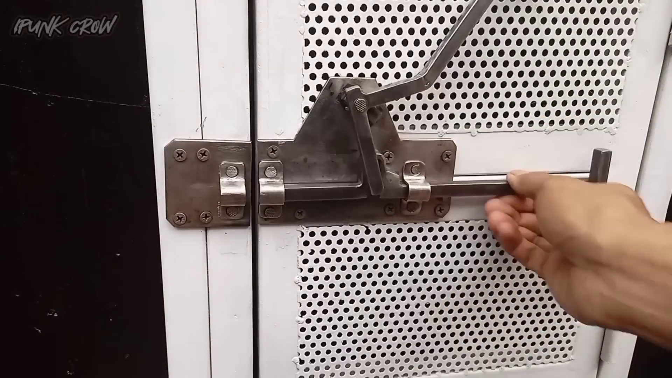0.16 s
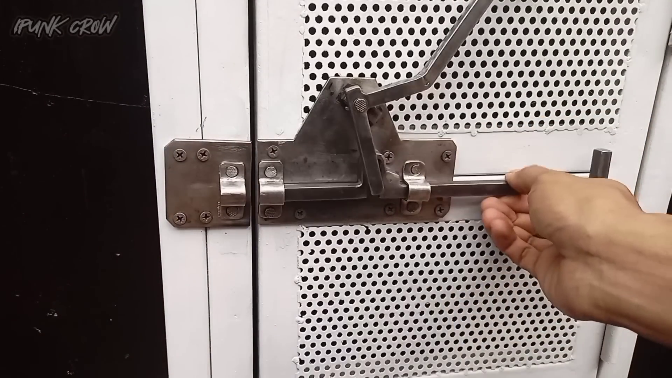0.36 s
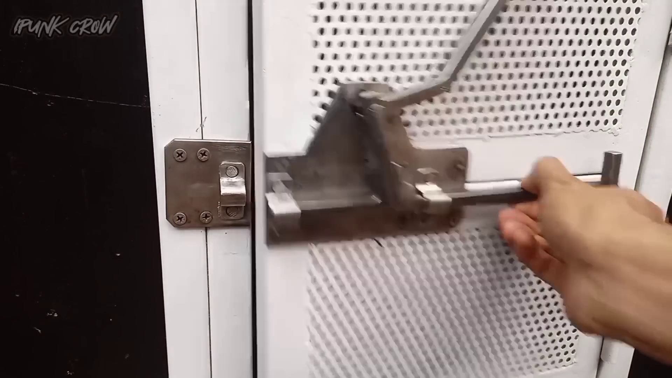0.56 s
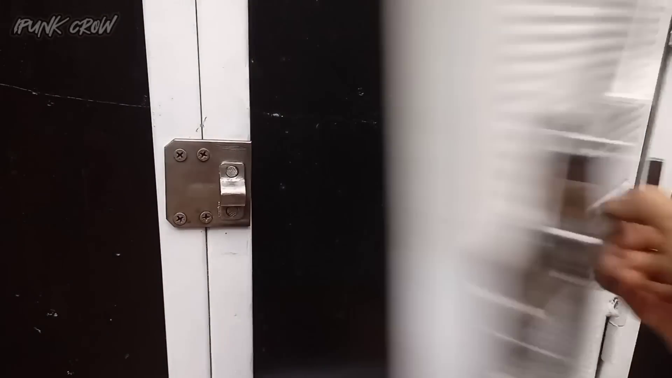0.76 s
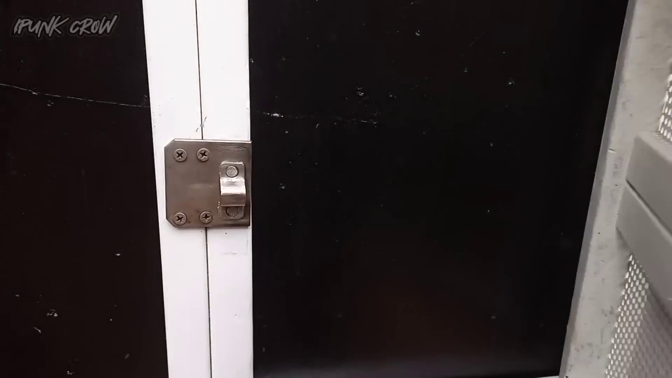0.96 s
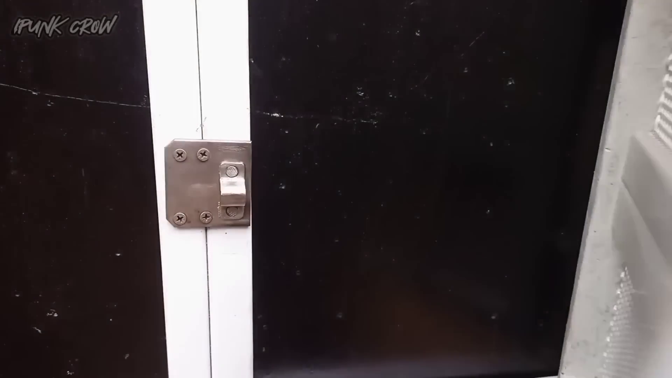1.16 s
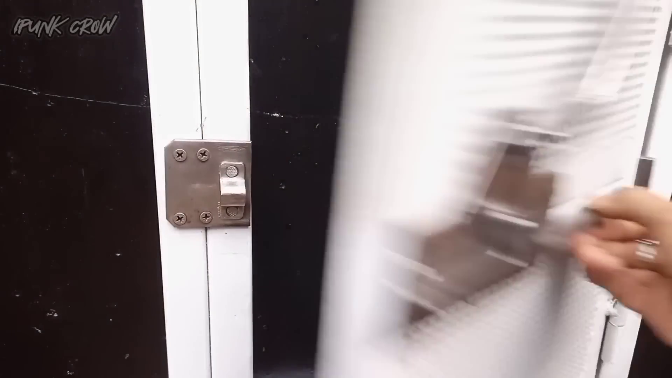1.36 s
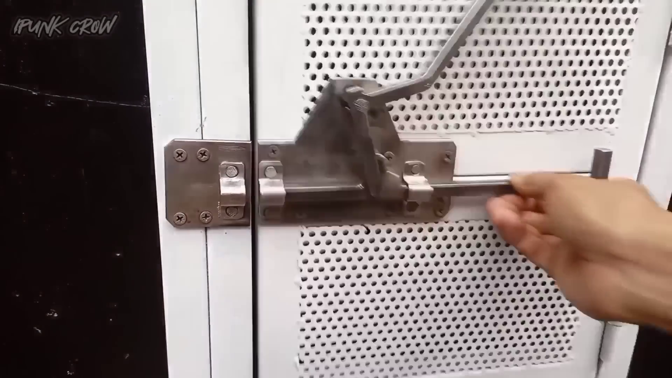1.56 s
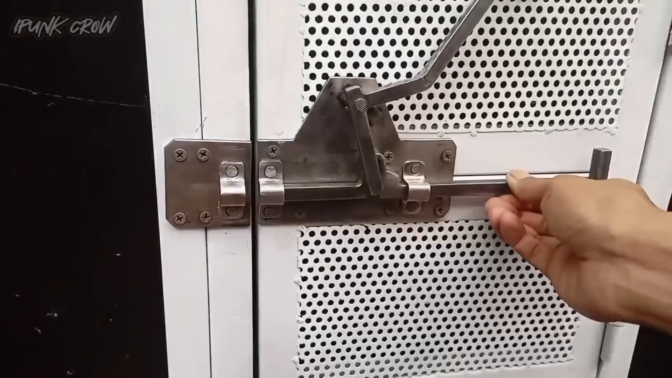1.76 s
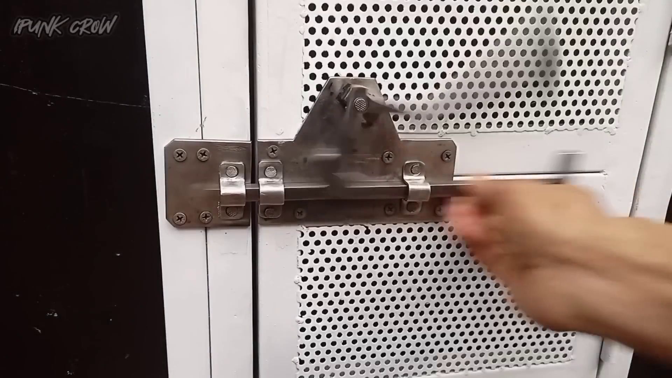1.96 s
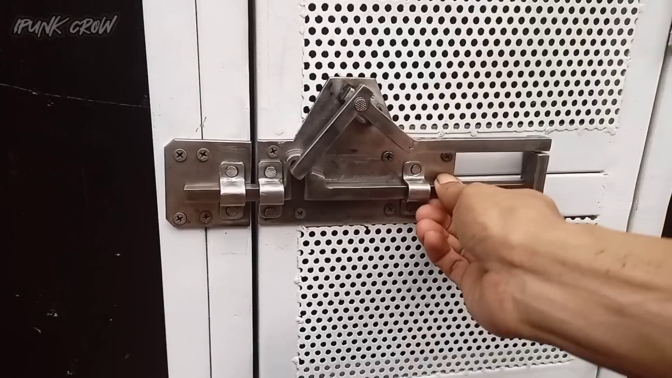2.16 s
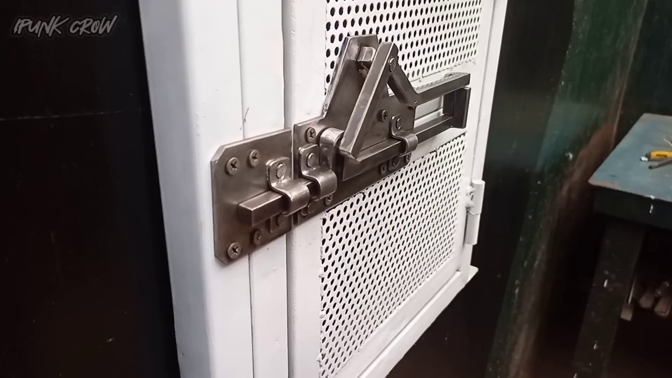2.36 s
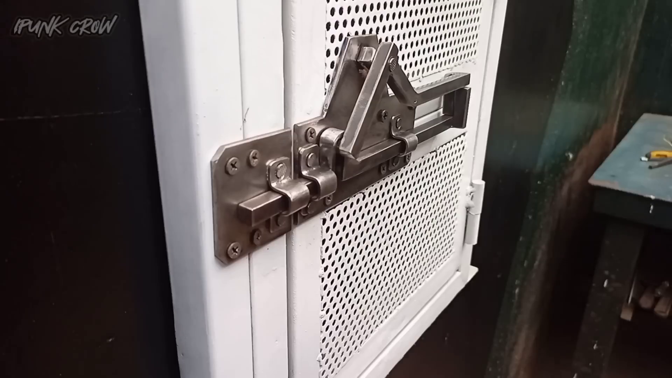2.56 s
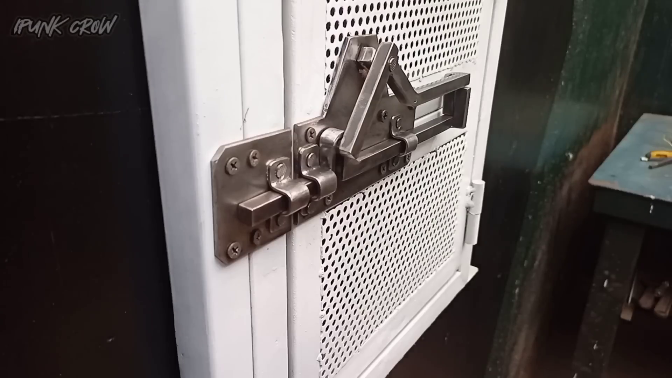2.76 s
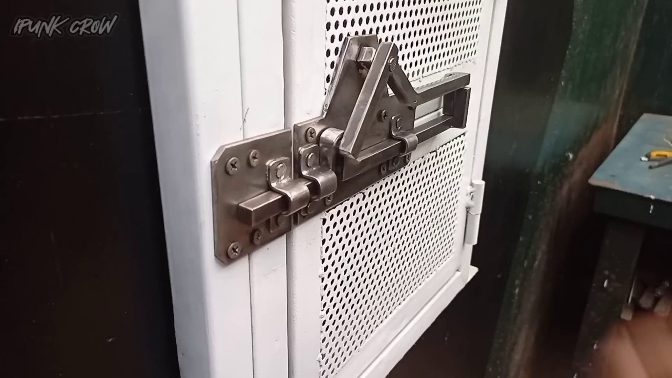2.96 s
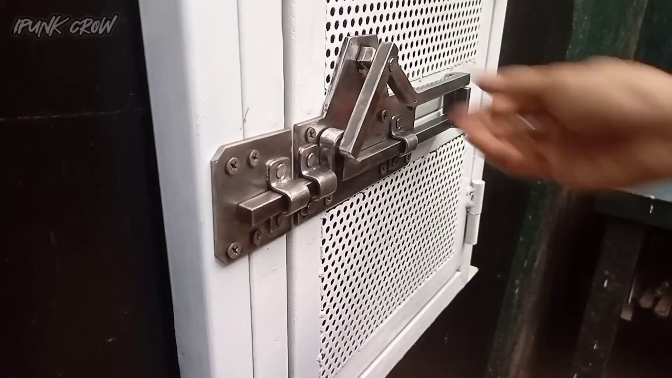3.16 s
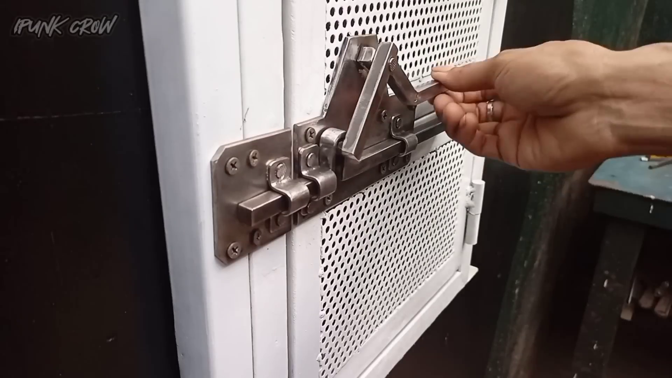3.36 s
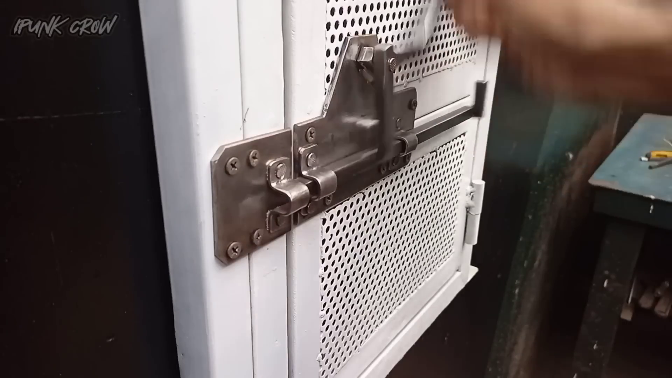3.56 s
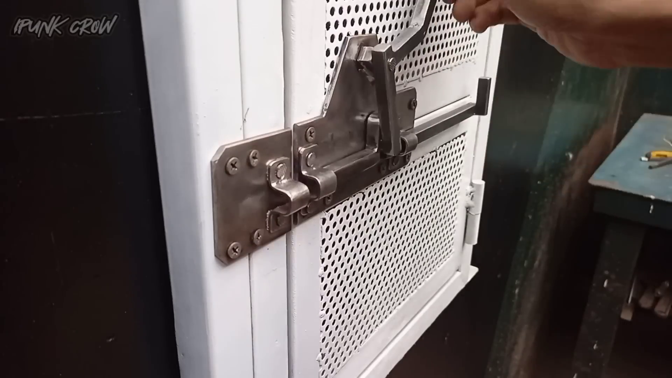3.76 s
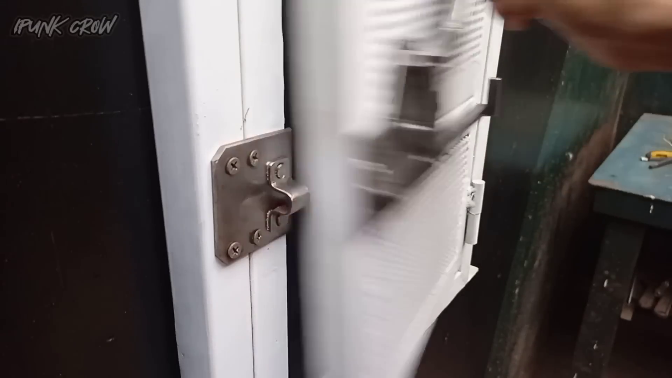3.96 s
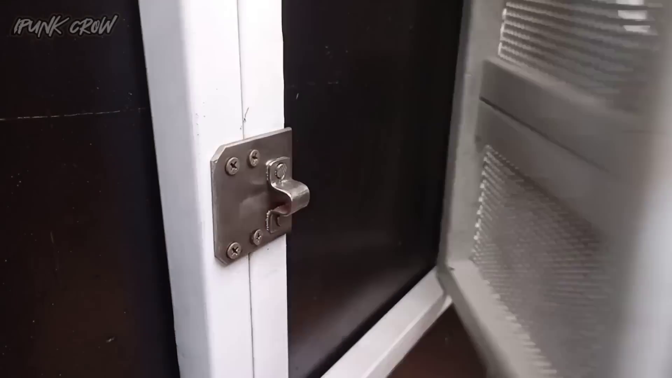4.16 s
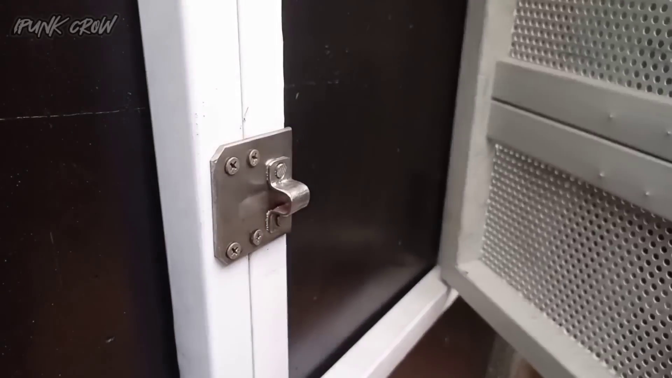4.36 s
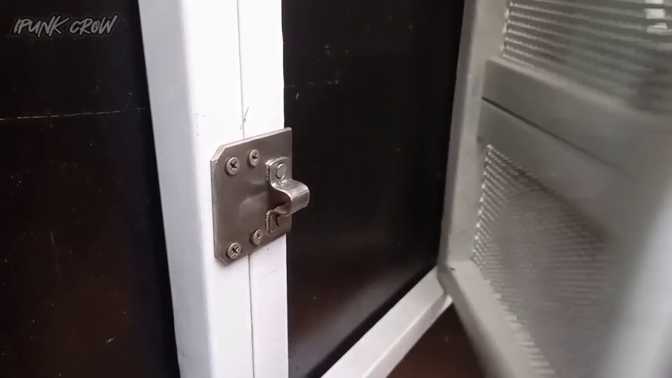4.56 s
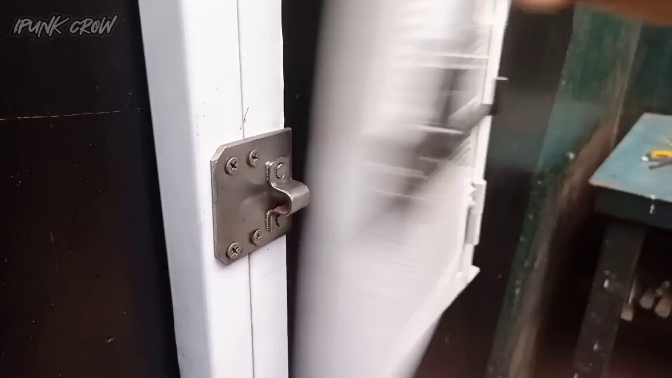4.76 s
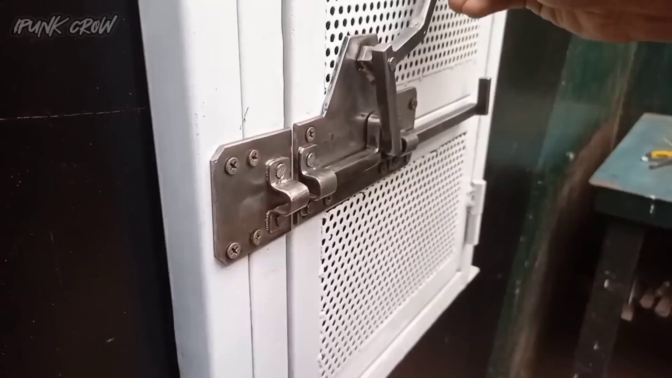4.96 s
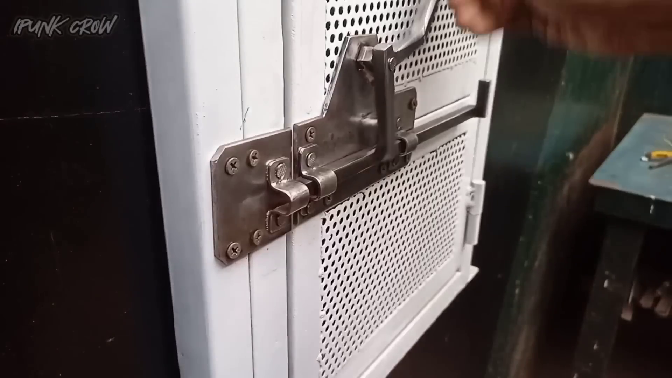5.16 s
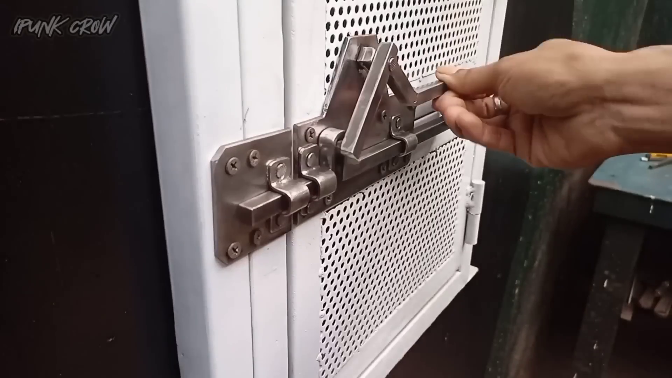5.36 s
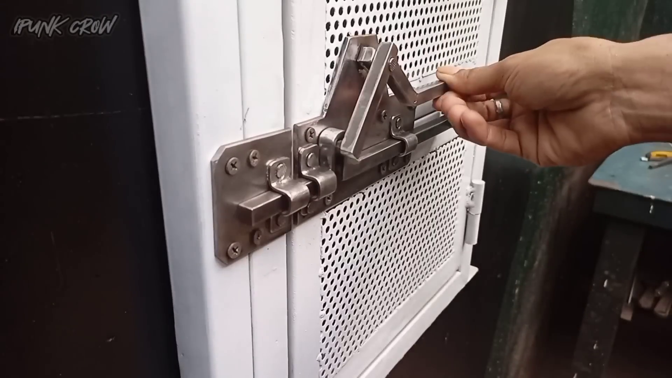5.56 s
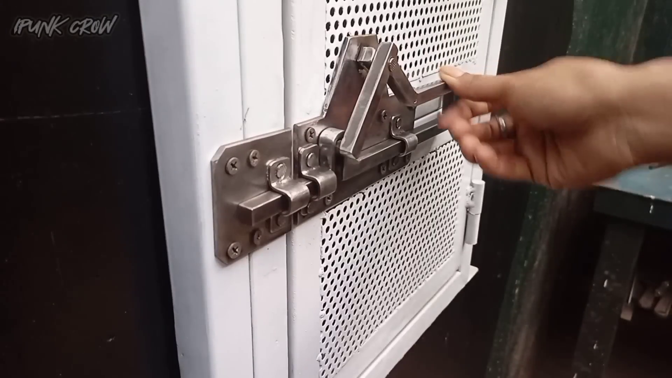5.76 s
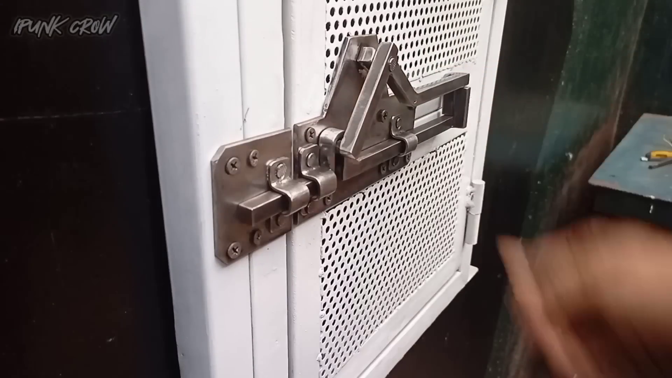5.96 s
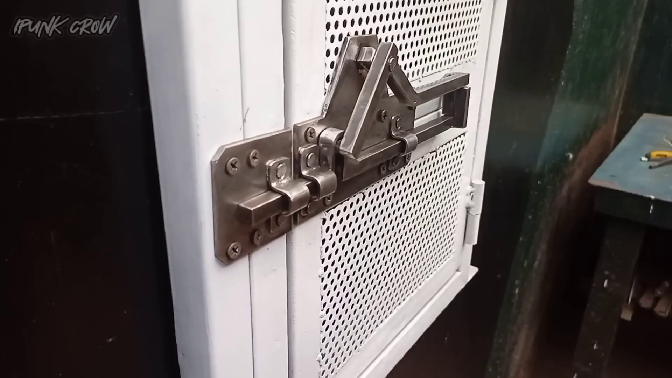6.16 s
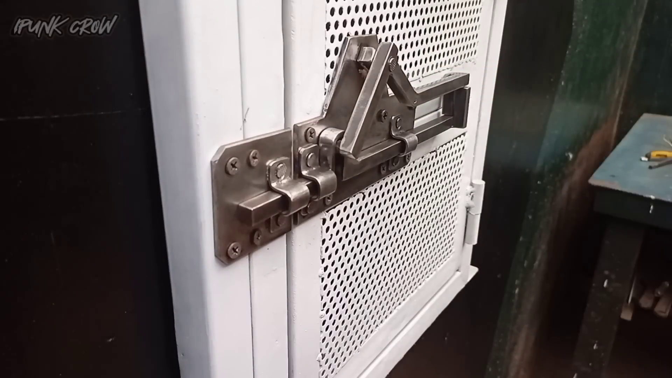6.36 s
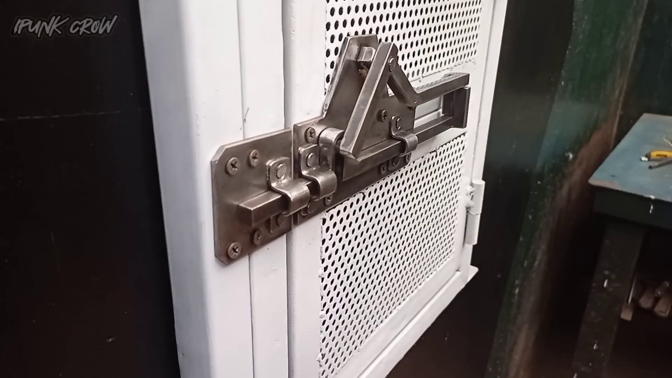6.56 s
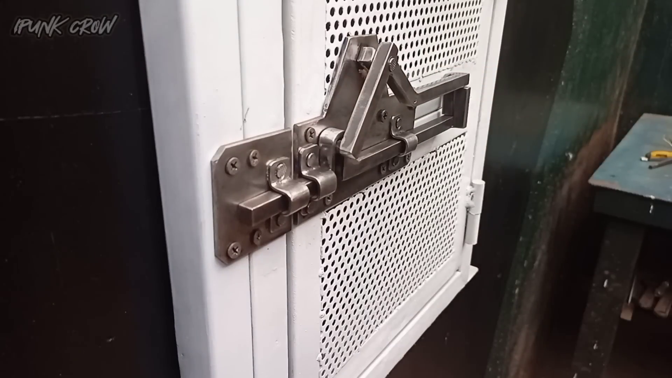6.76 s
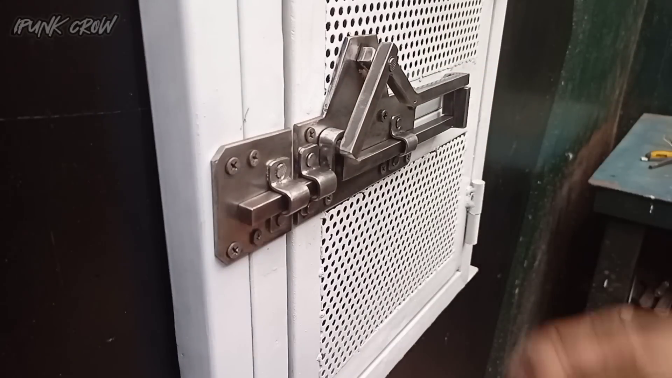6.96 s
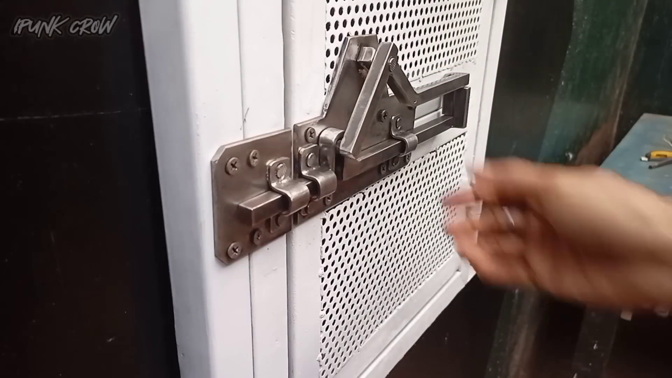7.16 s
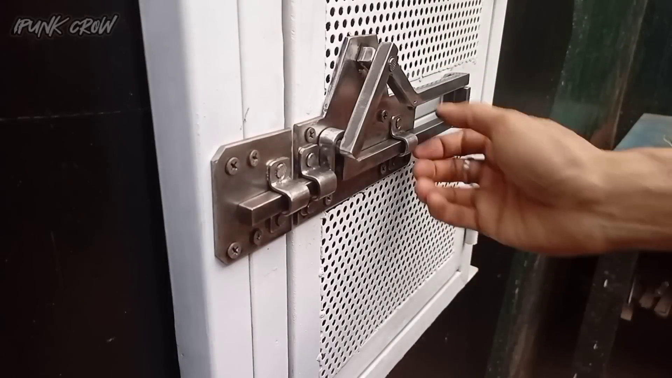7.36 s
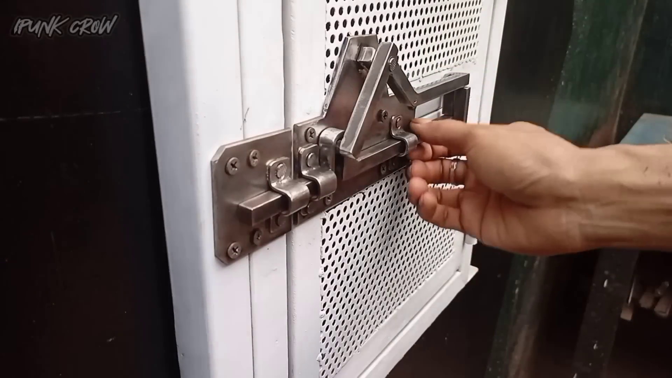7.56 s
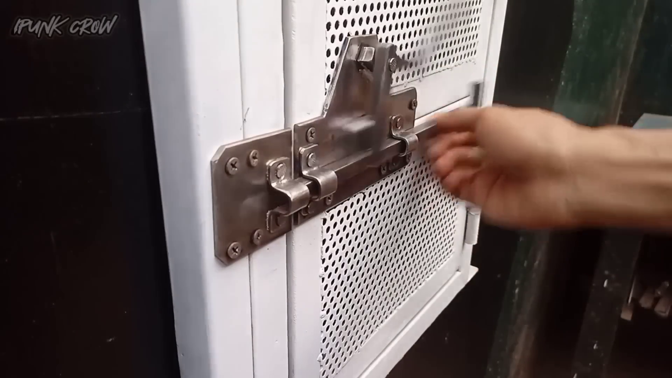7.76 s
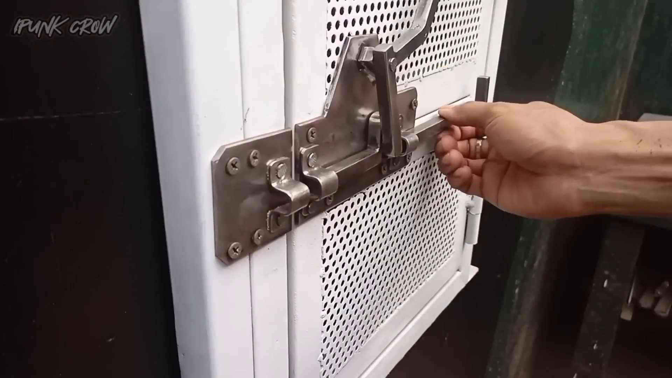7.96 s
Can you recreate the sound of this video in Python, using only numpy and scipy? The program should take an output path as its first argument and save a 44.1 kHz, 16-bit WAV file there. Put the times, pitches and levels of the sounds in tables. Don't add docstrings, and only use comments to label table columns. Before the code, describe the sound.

Close metallic clacks and short bolt scrapes, a sheet door banging shut twice, ringing echoes and a faint distant motor hum.

```python
import sys
import numpy as np
from scipy import signal
from scipy.fft import rfft, irfft
from scipy.io import wavfile
from scipy.ndimage import uniform_filter1d

SR = 44100
rng = np.random.default_rng(int(sys.argv[2]) if len(sys.argv) > 2 else 0)


def output_pcm(signal):
    pcm = np.clip(np.atleast_2d(signal).T, -1, 1) * 32767
    wavfile.write(sys.argv[1], SR, np.round(pcm).astype(np.int16))


def makeup_ratio(level_db):
    decades = np.asarray(level_db, float) / 20
    return 10 ** decades


N = 357210

# (frequency [Hz], level [dB])
MOTOR_PARTIALS = [(339.1, -83.5), (393.0, -68.5), (452.2, -73.5), (780.6, -82), (877.5, -78.5),
                  (952.8, -76), (1017, -77.5), (1513, -70), (1637, -87), (1690, -85.5), (1733, -87.5),
                  (1793, -84)]
# (time [s], motor gain [dB], air level [dB])
BACKGROUND_COURSE = [(0, -3.5, -61), (2.5, -5.5, -68), (2.6, -2.5, -68), (4, -1, -65.5), (6, -2.4, -65.5),
                     (8.1, -3, -67)]
# (frequency [Hz], density [dB per Hz])
AIR_SPECTRUM = [(76, -44), (130, -18.5), (240, -24.5), (350, -7.5), (450, -22), (560, -18), (950, -11),
                (1150, -16.5), (1370, -28.5), (1520, -7), (1800, -14), (2100, -28.5), (2700, -31),
                (3500, -23), (4500, -22), (5100, -30.5), (6300, -27.5), (7500, -40.5), (8400, -60)]
# (centre time [s], half length [s], level [dB])
RUMBLE_SWELLS = [(.55, .2, -61), (1.4, .25, -64), (1.95, .15, -58.5), (2.45, .25, -71.5), (3.9, .12, -69.5),
                 (4.5, .1, -74.5), (5.2, .3, -71), (5.55, .15, -60), (6.4, .2, -69), (7.1, .2, -74),
                 (7.65, .3, -72.5)]
# (frequency [Hz], level [dB], t60 [s])
ROOM_BANDS = [(246.5, -3, 0.54), (616, -4.5, 0.59), (1100, -1.5, 0.23), (1800, -2.5, 0.4), (3174, -4, 0.52),
              (4500, -1.5, 0.35), (6500, 0.5, 0.2), (7400, -6.5, 0.56)]
# (time [s], level [dB])
SLAMS = [
    (1.773, -30.5),
    (5.05, -27.5),
]
# (frequency [Hz], level [dB], t60 [s])
LEAF_BANDS = [(116.25, -5, .4), (176, -5.5, 0.59), (243, -2, 1), (285, 4.5, 0.41), (395, -9.5, 0.48),
              (537.6, 4, 0.46), (750, -3.5, 0.61)]
# (frequency [Hz], level [dB], t60 [s])
LEAF_MODES = [(76.5, -15, 0.68), (162.6, -3, .4), (227, -3.5, .55), (322, -2, .35), (409, -2, .4),
              (515, -12.5, 0.34), (532, -14.5, 0.34)]
# (time [s], peak [dB], frequency [Hz], t60 [s])
PINGS = [(.176, -22.5, 1640, 0.18), (.195, -26.5, 6560, .044), (.2655, -16.5, 2230, .057),
         (.265, -16.5, 6500, .03), (.77, -60, 2150, 0.085), (3.75, -28.5, 2735, 0.094),
         (3.788, -19.5, 2100, 0.061), (3.788, -20.5, 3420, .07), (4.046, -32, 2250, 0.06),
         (4.062, -35, 2370, 0.028), (4.112, -36.5, 2150, 0.05), (4.288, -54.5, 5500, .036),
         (5.392, -22, 3380, 0.053), (5.427, -13.5, 3323, .09), (5.428, -13.5, 2133, .09),
         (5.452, -18, 3574, 0.0699), (5.452, -23, 2166, 0.13), (5.472, -17.5, 2870, 0.049),
         (7.931, -16.5, 3640, 0.081), (7.933, -19.5, 2740, 0.065), (7.933, -26, 4240, .07)]
# (time [s], peak [dB], frequency [Hz])
PLATE_NOTES = [(.17, -37.5, 860), (.997, -39, 750), (1.776, -28, 749), (5.054, -33, 775), (2.098, -41, 764),
               (2.118, -41, 724), (2.136, -35.5, 730), (3.684, -50, 895), (4.13, -58, 930),
               (4.412, -46.5, 940), (7.629, -49.5, 948), (7.931, -56, 890)]
# (frequency [Hz], density [dB per Hz])
STEEL_SPECTRUM = [(290, -45.5), (500, -21), (1210, -11.5), (1610, -10.5), (2110, -7.5), (2430, -10),
                  (3450, -11), (4530, -12.5), (6530, -11.5), (7520, -10), (8360, -6.5), (10900, -68),
                  (18400, -120)]
# (frequency [Hz], level [dB], t60 [s])
LATCH_MODES = [(1284, -14.5, 0.17), (1750, -24, 5.0), (1863, 3.5, 0.11), (2014, -2, 0.26),
               (2380, -27, 0.26), (3520, -7, 0.062), (3630, 0.5, 0.099), (3750, -11, 0.51),
               (3700, -25, 5.0), (4420, -4, 0.055), (4420, -33, 1.4), (4944, -20, 0.36), (5500, -33, 5.0),
               (6310, -6.5, 0.31), (6500, -30, 0.49), (6960, -55, 0.29)]
# (start time [s], end time [s], start level [dB], end level [dB], centre frequency [Hz])
SLIDES = [
    (0.175, 0.265, -17, -22.5, 2240),
    (2.1, 2.145, -27, -36, 2340),
    (2.158, 2.214, -24.5, -10, 2690),
    (3.7, 3.784, -25.5, -20, 2750),
    (3.79, 3.81, -18, -21, 2760),
    (5.432, 5.482, -13, -27, 2523),
    (7.94, 8.019, -14, -14.5, 2870),
]
# (time [s], peak [dB], strongest ring [Hz], treble re peak [dB])
GRAZES = [
    (1.741, -53, 2912, -15),
    (3.47, -59, 2284, -18),
    (5.025, -52, 3400, -12),
    (6.83, -66, 1800, -5),
    (6.89, -62, 2004, -13),
    (7.618, -46, 2585, -24),
    (7.916, -47.5, 3450, -17),
]
# (time [s], peak [dB], strongest ring [Hz], treble re peak [dB], rattle t60 [s])
TAPS = [(0.6227, -39, 2990, -6.5, 0.048), (0.9956, -20.5, 1830, -7.5, 0.038),
        (1.4636, -47.5, 1877, -12.5, 0.064), (3.4602, -50.5, 2310, -21.5, .06),
        (4.1297, -16, 3760, -9, .03), (4.4139, -35.5, 2710, -14, 0.12), (7.629, -29.5, 2860, -23, .045),
        (7.7254, -39, 2250, -21, 0.11)]
EARLIER_BLOW = (-.06, -31, 3600, -8, -6)
# (time [s], peak [dB], strongest ring [Hz], treble re peak [dB], echo share [dB])
THROWS = [(0.17, -11.5, 3634, -13.5, -6.5), (0.1959, -23.5, 1635, -2.5, -4),
          (0.2085, -20.5, 1630, -14, -8.5), (2.0912, -28.5, 2380, -6, 2), (2.0965, -19, 2250, -9.5, -8),
          (2.1156, -26.5, 2920, -29.5, -11), (2.1499, -17, 3630, -17.5, -15), (2.1537, -11.5, 1857, -5, 1),
          (3.6832, -17.5, 3043, -20, -13.5), (3.7389, -27, 2570, -28.5, -6), (3.7702, -15, 2633, -10, -3),
          (3.7883, -20.5, 3400, -16.5, -9), (3.8127, -16.5, 3590, -11, -7.5),
          (5.3473, -28.5, 3240, -8.5, -3.5), (5.3749, -26.5, 3857, -13, -1),
          (5.391, -17, 6700, -8.5, -12.5), (5.4291, -19.5, 2170, -6, -14.5), (5.452, -18, 2106, -19.5, 5),
          (7.9324, -14.5, 3590, -12, -4)]
# (time [s], peak [dB], strongest ring [Hz], treble re peak [dB])
BOUNCES = [
    (1.7753, -11, 6380, -9.5),
    (1.7874, -13.5, 1800, -17.5),
    (1.8114, -20.5, 4250, -9.5),
    (5.0539, -5, 2380, -7),
    (5.0614, -9.5, 2370, -17),
    (5.0795, -10, 2247, -12.5),
]
# (frequency [Hz], level [dB], swell [s])
THUD_MODES = [(115, -7.5, 0.0025), (316, -6, 0.00079), (609, -2.5, 0.0011)]
# (time [s], peak [dB], strongest ring [Hz], thump [dB], excess [dB])
STOPS = [
    (0.275, -9, 1735, -26, 7.5),
    (2.2111, -7, 6100, -25.5, 9),
    (3.8288, -8, 3560, -25, 6.5),
    (5.4879, -6.5, 3170, -22.5, 6),
    (8.0254, -6, 3540, -22.5, 10),
]


def level(x, db):
    return x * makeup_ratio(db) / np.sqrt(np.mean(x ** 2))


def peak(x, db):
    return x * makeup_ratio(db) / np.abs(x).max()


def decay(t, t60):
    return np.exp(-np.log(1000) * t / t60)


def colour(x, table):
    hz, db = np.transpose(table)
    f = np.arange(len(x) // 2 + 1) * SR / len(x) + 1
    return irfft(rfft(x) * makeup_ratio(np.interp(np.log(f), np.log(hz), db)), len(x))


def band(x, hz, width):
    return signal.lfilter(*signal.iirpeak(hz, hz / width, fs=SR), x)


def double_band(x, hz, width):
    return band(band(x, hz, width), hz, width)


def walk(rate):
    k = int(SR / rate)
    held = np.repeat(rng.standard_normal(N // k + 1), k)
    return 1.3 * uniform_filter1d(uniform_filter1d(held, k), k)[:N]


def add(out, x, s):
    i = int(s * SR)
    a, b = max(i, 0), min(i + len(x), len(out))
    out[a:b] += x[a - i:b - i]


def motor():
    t = np.cumsum(1 + 0.001 * walk(1.2)) / SR
    out = np.zeros(N)
    for hz, db in MOTOR_PARTIALS:
        flicker = np.sqrt(2) * makeup_ratio(db + 2.5 * walk(18))
        out += flicker * np.sin(2 * np.pi * hz * t + 1.5 * walk(13))
    return out


def moving_air():
    patches = np.zeros(N)
    for hz in 130 * 2 ** np.arange(0, 6.1, .1):
        noise = double_band(rng.standard_normal(N), hz, hz / 22) / np.sqrt(hz)
        gust_db = 3 * walk(7) + 3.5 * walk(22)
        patches += noise * makeup_ratio(min(hz / 2500, 1) * gust_db)
    return colour(patches, AIR_SPECTRUM)


def rumble():
    noise = double_band(rng.standard_normal(N), 78, 62) * makeup_ratio(2.0 * walk(21))
    s, half, db = np.transpose(RUMBLE_SWELLS)[:, :, None]
    bells = makeup_ratio(db) * np.exp(-((np.arange(N) / SR - s) / half) ** 2)
    return level(noise, 0) * (makeup_ratio(-80.5) + np.sum(bells, axis=0))


def background():
    s, *columns = np.transpose(BACKGROUND_COURSE)
    motor_db, air_db = [np.interp(np.arange(N) / SR, s, column) for column in columns]
    return motor() * makeup_ratio(motor_db) + level(moving_air(), air_db) + rumble()


def echo(size=32768):
    t, out = np.arange(size) / SR, np.zeros(size)
    for hz, db, t60 in ROOM_BANDS:
        noise = double_band(rng.standard_normal(size), hz, 0.85 * hz)
        out += level(noise, db) * np.sqrt(hz) * decay(t, t60)
    gate = np.exp(-(t / 0.41) ** 4)
    out *= (1 - np.exp(-t / 0.0069)) * gate
    return out / np.sqrt(np.sum(out ** 2))


def room(sent, count=8):
    spot_s = .003
    turn = np.arange(len(sent)) / SR / spot_s
    wet = np.zeros(len(sent))
    for k in range(count):
        distance = np.abs((turn - k) % count - count / 2)
        share = np.cos(np.pi / 2 * np.minimum(distance, 1))
        wet += signal.fftconvolve(sent * share, echo())[:len(sent)]
    return wet


def slams(size=30000):
    out, t = np.zeros(N), np.arange(size) / SR
    for s, db in SLAMS:
        crowd, clear = np.zeros((2, size))
        for hz, mode_db, t60 in LEAF_BANDS:
            noise = double_band(rng.standard_normal(size), hz, 1.1 * hz)
            crowd += level(noise, mode_db) * decay(t, t60)
        for hz, mode_db, t60 in LEAF_MODES:
            clear += makeup_ratio(mode_db) * np.sin(2 * np.pi * (hz * t + rng.random())) * decay(t, t60)
        boom = (peak(crowd, -4.5) + peak(clear, -2)) * (1 - np.exp(-t / 0.012))
        add(out, boom * makeup_ratio(db + 5.0), s)
    return out


def ping(hz, t60, size=8192):
    t = np.arange(size) / SR
    noise = double_band(rng.standard_normal(size), hz, .14 * hz)
    return peak(noise * (1 - np.exp(-t / .0008)) * decay(t, np.clip(t60, .01, .4)), 0)


def steel(noise, hz, bright_db, ring_db):
    contact = [(800, -8.5), (1400, -5), (4200, -2.0), (5200, bright_db + 6.5)]
    x = colour(colour(noise, STEEL_SPECTRUM), contact)
    return level(x, 0) + level(band(x, hz, 0.41 * hz), ring_db)


def slides():
    out = np.zeros(N)
    for start, end, start_db, end_db, hz in SLIDES:
        t = np.arange(0, end - start, 1 / SR)
        noise = rng.standard_normal(8192)
        slip_sizes = makeup_ratio(3 * np.minimum(rng.exponential(size=64), 2.5))
        slips = uniform_filter1d(slip_sizes.repeat(128), 64)
        grit = level(steel(noise * slips, hz, -17.5, -11), 0)[:len(t)]
        edges = np.minimum(np.minimum(t, t[-1] - t) / 0.0033, 1)
        jerk = makeup_ratio(start_db - 1000.5 * t)
        press = makeup_ratio(end_db - 300.5 * (t[-1] - t))
        add(out, grit * edges * (jerk + press) * makeup_ratio(-10.0), start)
    return out


def ring(gains, size):
    hz, db, t60 = np.transpose(LATCH_MODES)[:, :, None]
    t = np.arange(size) / SR
    modes = decay(t, np.clip(t60, .02, .11)) * np.sin(2 * np.pi * hz * t)
    return np.sum(gains[:, None] * makeup_ratio(db) * modes, axis=0)


def blow(hz, bright_db, t60, ring_db=-7, size=8192):
    t = np.arange(size) / SR
    chatter, push = rng.standard_normal((2, size))
    gains = rng.standard_normal(len(LATCH_MODES))
    fade = (1 - np.exp(-t / .002)) * decay(t, np.clip(t60, .01, .4))
    excitation = (push * np.exp(-t / 0.0032))[:1024]
    modes = signal.fftconvolve(ring(gains, size), excitation)[:size]
    return peak(steel(chatter, hz, bright_db, ring_db) * fade, 0) + peak(modes, -19.5)


def thump(size=4096):
    t = np.arange(size) / SR
    body = np.zeros(size)
    for hz, db, swell in THUD_MODES:
        pulse = t / swell * np.exp(-t / swell)
        body += makeup_ratio(db) * pulse * np.sin(2 * np.pi * (hz * t + rng.random()))
    push = rng.standard_normal(size) * t * np.exp(-t / 0.0035)
    shudder = band(band(push, 190, 1100), 150, 1200)
    return peak(peak(body, 0) + peak(shudder, -4), 0)


def latch():
    blows = [(*row, .055) for row in [EARLIER_BLOW, *THROWS]]
    blows += [(*row, -8, .055) for row in BOUNCES]
    blows += [(*row, -12, t60) for *row, t60 in TAPS]
    blows += [(*row, -6.5, 0.18) for row in GRAZES]
    sounds = []
    for s, db, hz, bright_db, echo_db, t60 in blows:
        sounds.append((s, makeup_ratio(db) * blow(hz, bright_db, t60), echo_db))
    for s, db, hz, t60 in [*PINGS, *((*row, 0.05) for row in PLATE_NOTES)]:
        sounds.append((s, makeup_ratio(db) * ping(hz, t60), -16))
    for s, db, hz, thump_db, excess_db in STOPS:
        sounds.append((s, makeup_ratio(db + excess_db) * blow(hz, -8.5, 0.044, -15.5), -7))
        sounds.append((s, makeup_ratio(thump_db + excess_db + 3.5) * thump(), -18))
    return sounds


def scene():
    lead = SR // 4
    near, sent = np.zeros((2, N + lead))
    for s, sound, echo_db in latch():
        add(near, sound, s + lead / SR - .001)
        add(sent, sound * makeup_ratio(echo_db), s + lead / SR)
    scrape = slides()
    sent[lead:] += scrape * makeup_ratio(-1.0)
    wet = room(sent)[lead:]
    return (near[lead:] + scrape + slams() + wet + background())[None]


def top_cut(x):
    return signal.sosfilt(signal.butter(12, 15440, fs=SR, output="sos"), x)


def record(dry):
    look_ahead_s, recover_s = .011, .105
    t, duck_db = np.arange(N) / SR, np.zeros(N)
    for s, *_, excess_db in STOPS:
        times = [s - look_ahead_s - .004, s - look_ahead_s, s + 0.0056, s + recover_s]
        duck_db += excess_db * np.interp(t, times, [0, 1, 1, 0])
    x = np.tanh(dry * makeup_ratio(-duck_db))
    x = signal.sosfilt(signal.butter(2, 55, "highpass", fs=SR, output="sos"), x)
    x = signal.sosfilt(signal.cheby2(10, 62, 8900, fs=SR, output="sos"), x)
    x = x + makeup_ratio(-91.0) * rng.standard_normal(N)
    return top_cut(x)


dry = scene()
out = record(dry)
output_pcm(out)
```